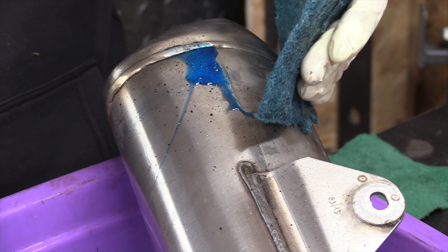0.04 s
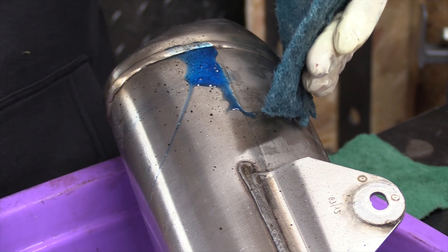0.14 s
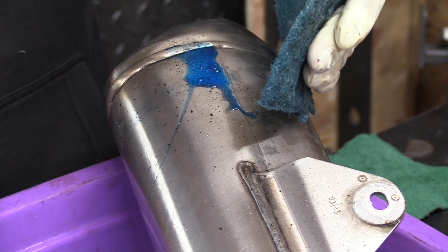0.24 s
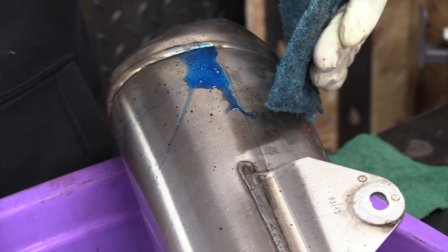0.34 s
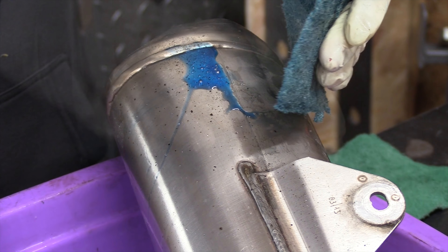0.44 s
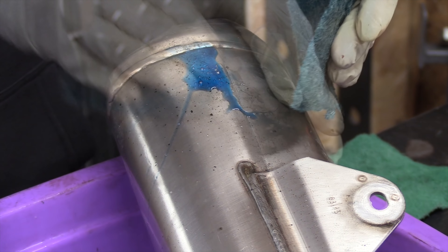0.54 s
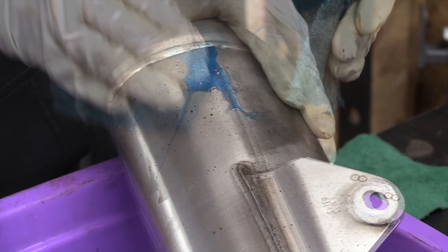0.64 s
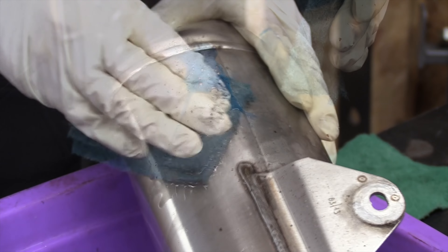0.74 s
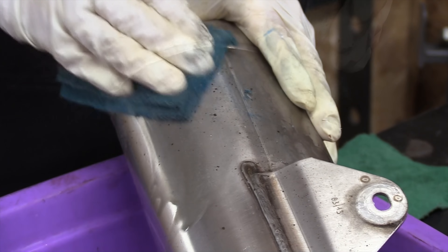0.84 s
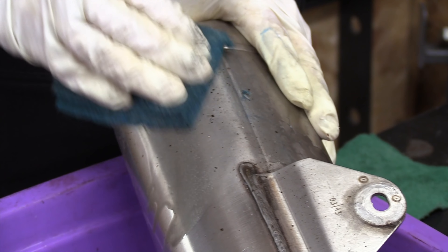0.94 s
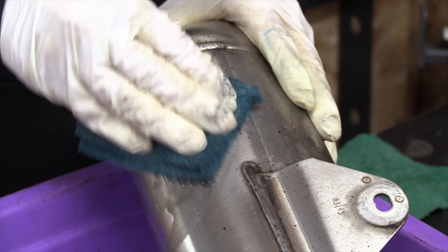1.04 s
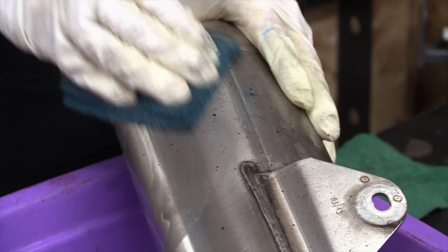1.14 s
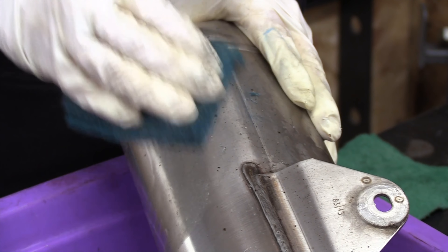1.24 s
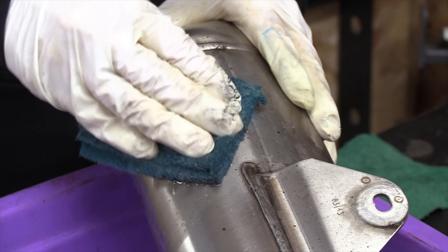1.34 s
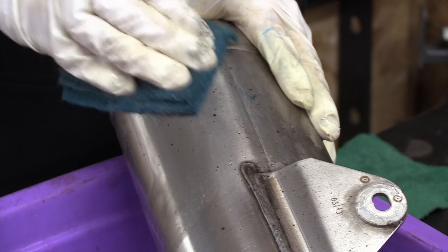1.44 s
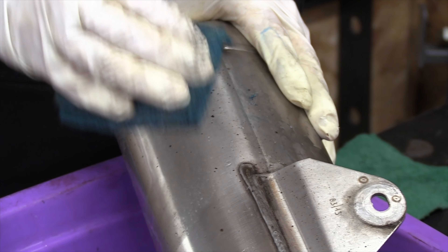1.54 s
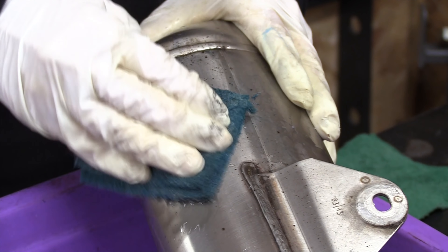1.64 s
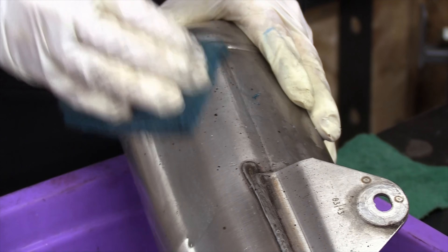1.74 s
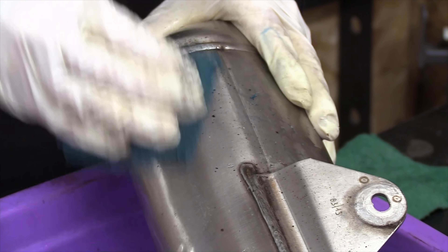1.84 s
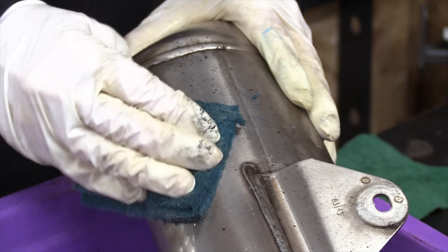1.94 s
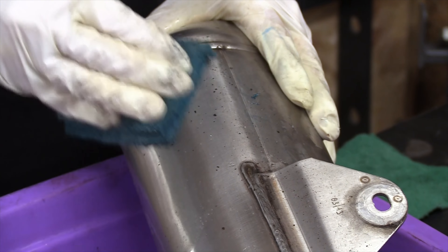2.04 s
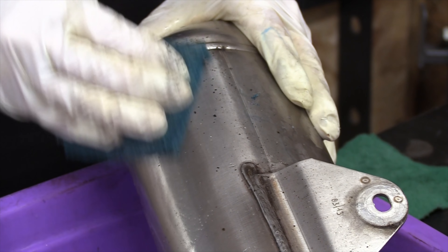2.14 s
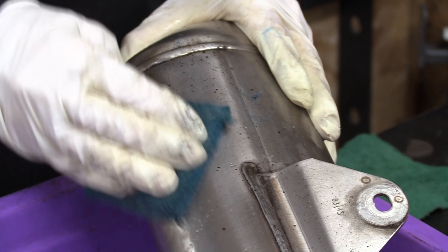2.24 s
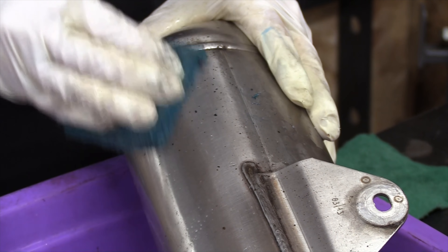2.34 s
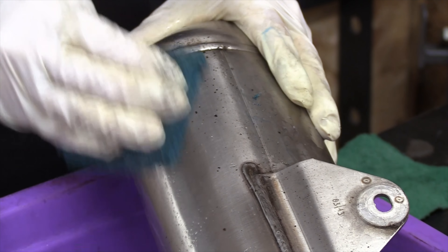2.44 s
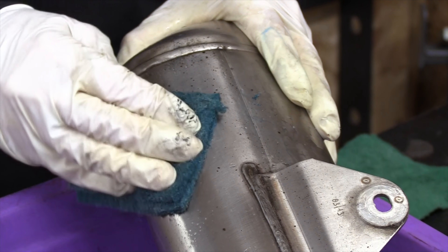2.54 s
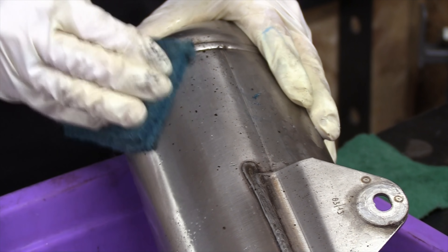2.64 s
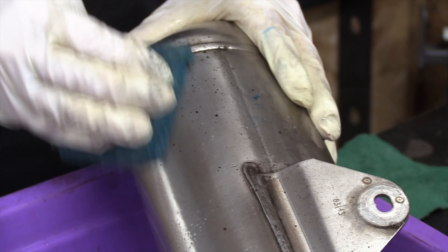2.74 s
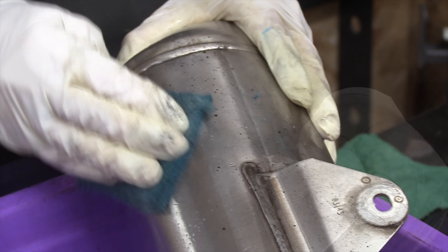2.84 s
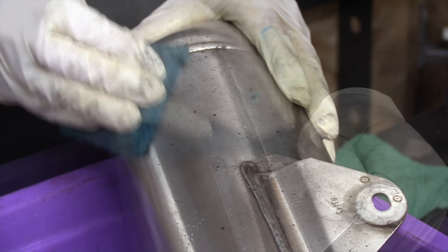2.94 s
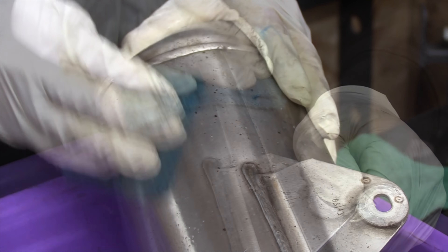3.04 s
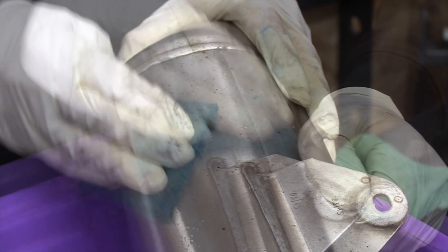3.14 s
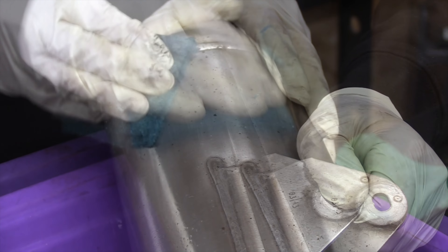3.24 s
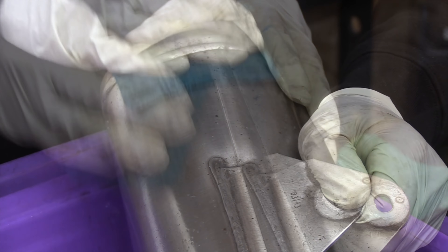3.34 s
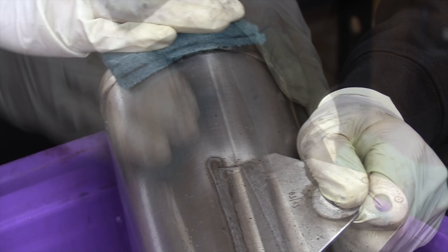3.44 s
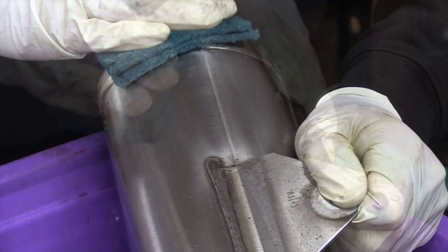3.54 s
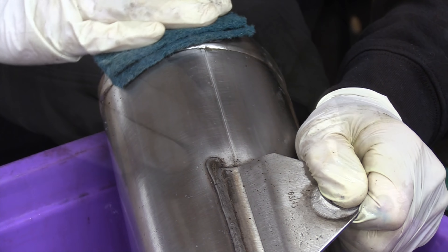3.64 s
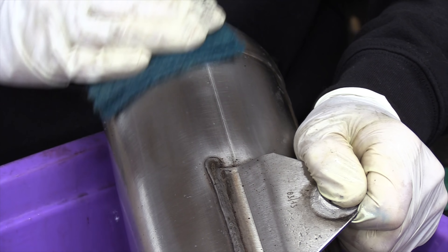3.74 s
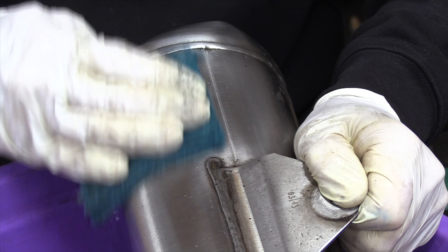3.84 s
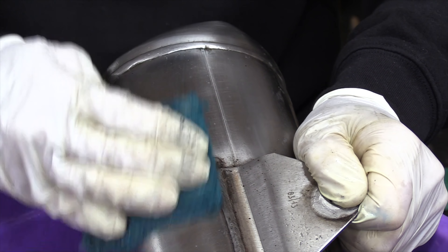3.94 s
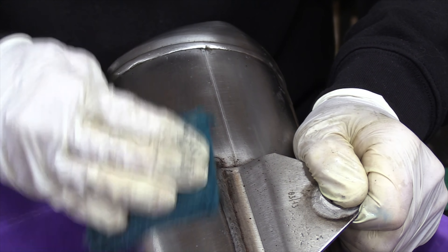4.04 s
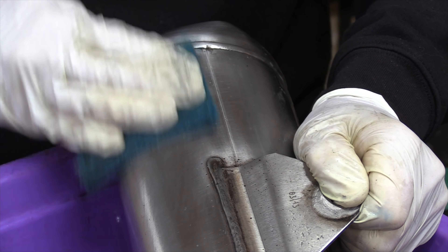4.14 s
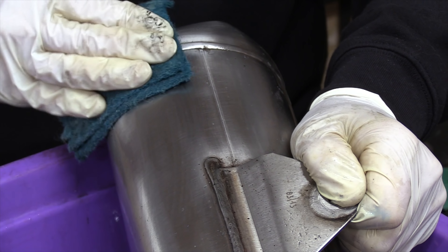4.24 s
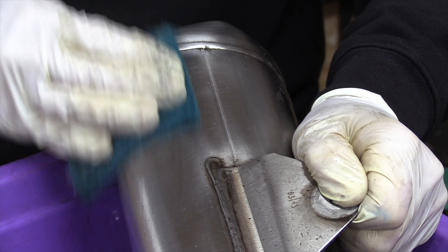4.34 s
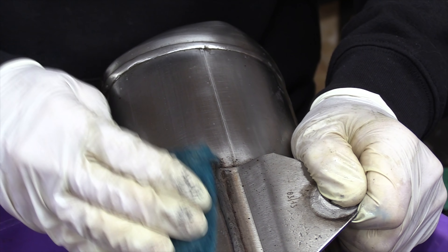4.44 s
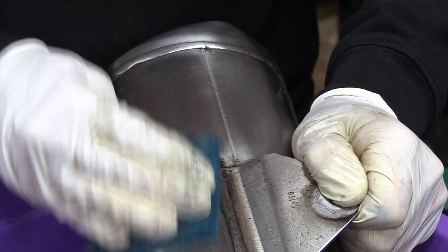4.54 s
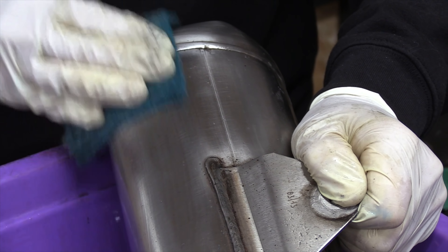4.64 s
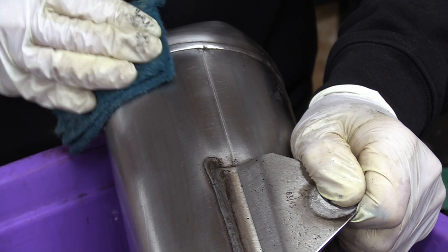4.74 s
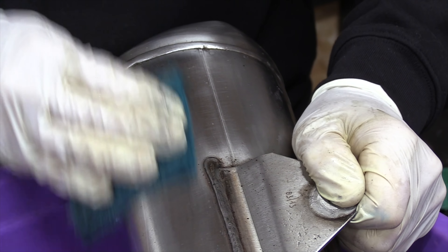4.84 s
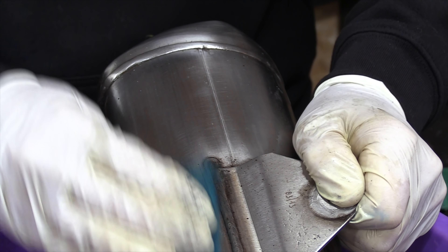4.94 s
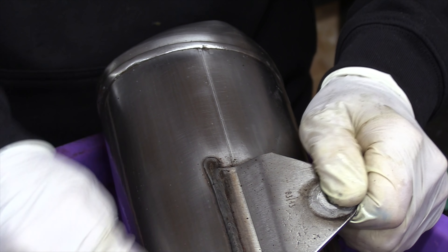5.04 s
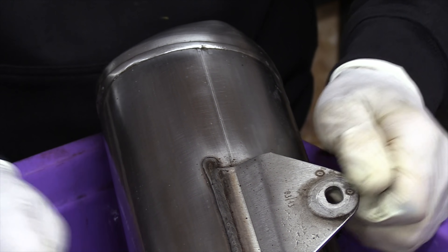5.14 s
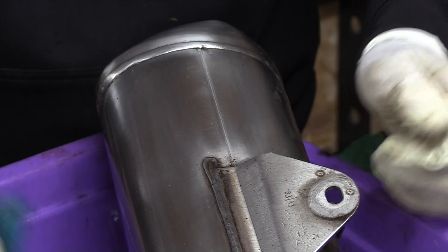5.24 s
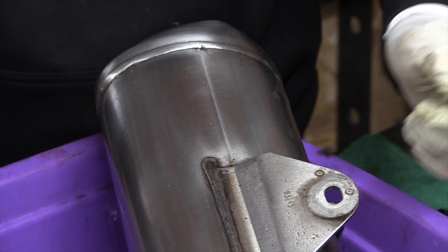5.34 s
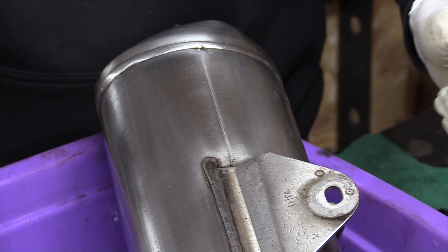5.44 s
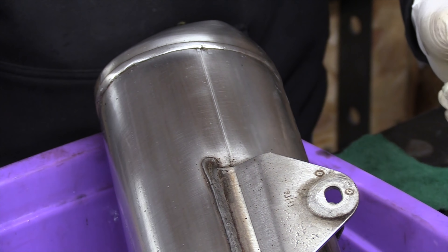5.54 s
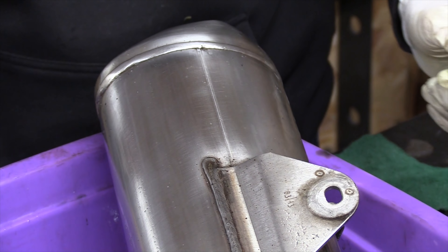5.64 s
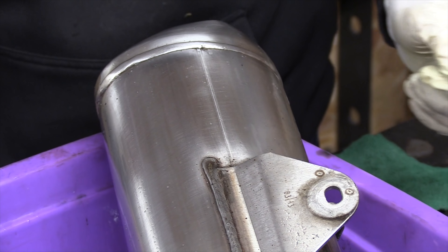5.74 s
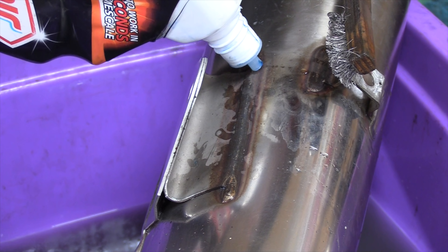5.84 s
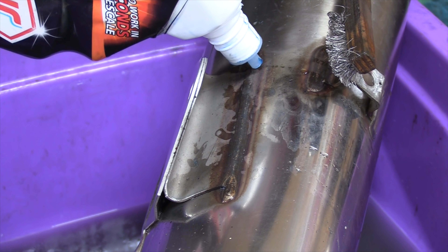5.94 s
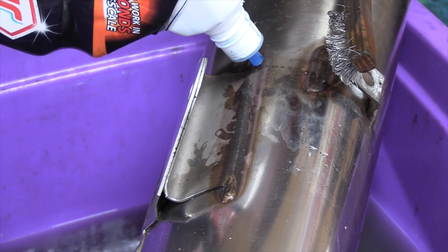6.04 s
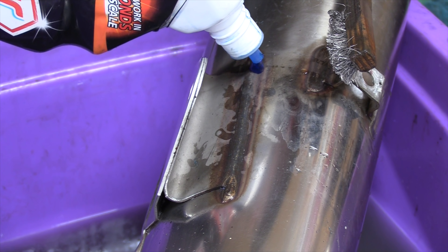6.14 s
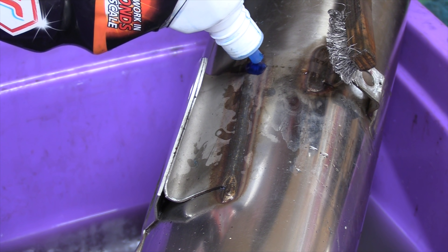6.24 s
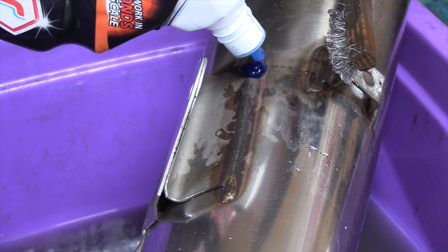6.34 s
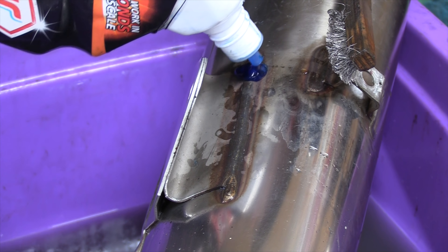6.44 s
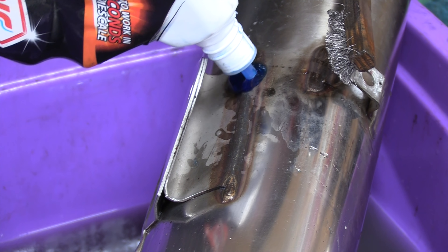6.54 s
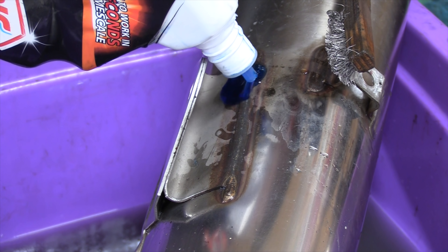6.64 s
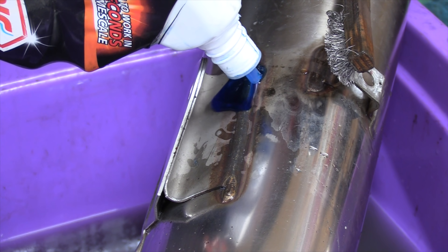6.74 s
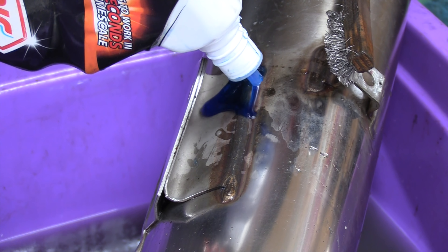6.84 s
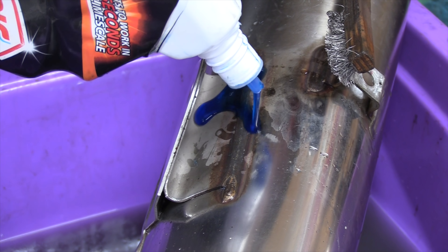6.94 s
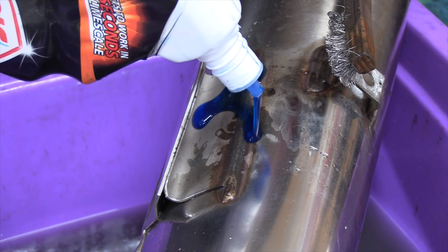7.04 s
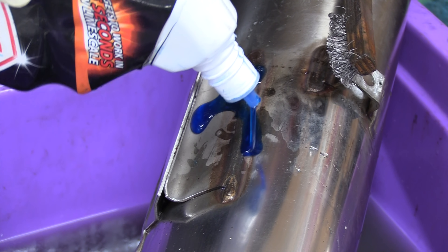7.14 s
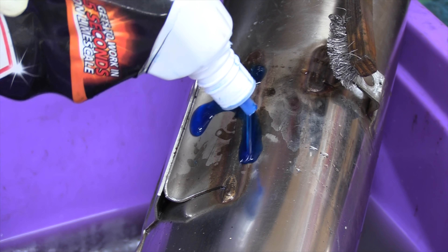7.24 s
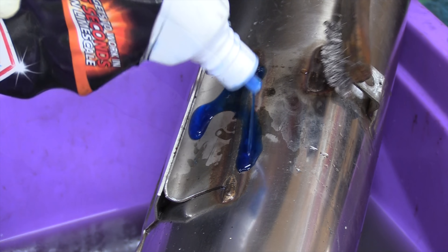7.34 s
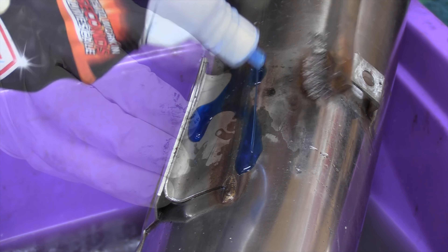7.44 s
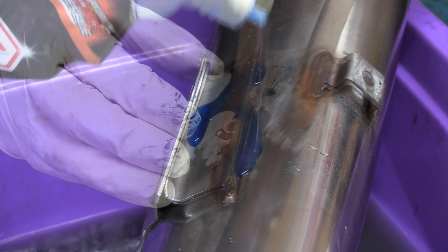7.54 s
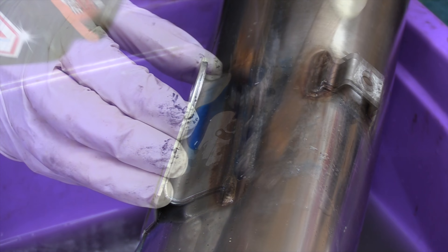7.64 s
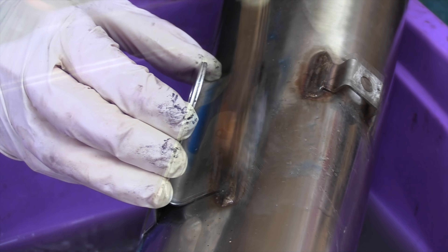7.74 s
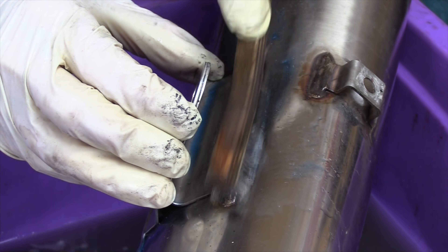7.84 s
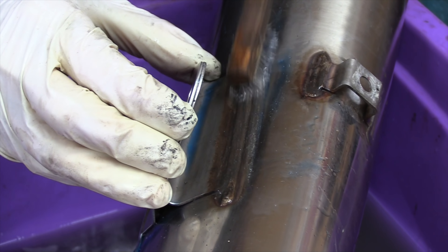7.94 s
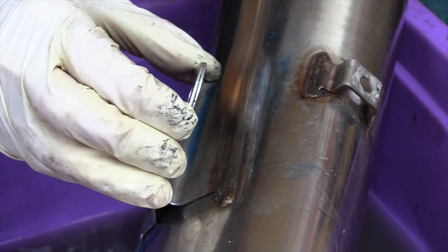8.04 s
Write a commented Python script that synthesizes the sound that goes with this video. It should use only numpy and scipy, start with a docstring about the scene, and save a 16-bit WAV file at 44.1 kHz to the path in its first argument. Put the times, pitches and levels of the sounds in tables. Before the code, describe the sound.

Close rasping of a scouring pad on hollow steel, knocking against a plastic tub, slowing to hissy wipes, then pausing before bright bracket scraping.

```python
"""A steel can's clang dies away over a fan's rush that swells and sinks: ringing modes and fading noise over coloured
noise. From half a second an abrasive pad scrubs the can, an exhaust part in a plastic tub: random grains drive its
rasp, ring and hiss, while knocks on the tub add clicks and ringing thuds. Longer wipes follow, with narrow rasps where
the pad drags, then a brief slide of tiny slips and a pause with one light tap on steel. At the end short strokes rub
a thin welded bracket and pluck bright pings from its modes. All but clang and fan echo in a small garage."""
import sys
import numpy as np
from scipy import signal
from scipy.fft import rfft, irfft
from scipy.io import wavfile
from scipy.ndimage import uniform_filter1d

SR = 44100
rng = np.random.default_rng(int(sys.argv[2]) if len(sys.argv) > 2 else 0)


def output_pcm(signal):
    """Save a mono or channel-first signal as 16-bit PCM at the path in sys.argv[1].

    Samples are clipped to [-1, 1] before scaling.
    """
    pcm = np.clip(np.atleast_2d(signal).T, -1, 1) * 32767
    wavfile.write(sys.argv[1], SR, np.round(pcm).astype(np.int16))


N = 357210
TIME = np.arange(N) / SR

# Colour of the opening clang's rattle. Each row: frequency in Hz, level in dB.
CLANG_COLOUR = [(60, -32), (140, -14), (300, 3.5), (600, 3.5), (1000, -5.5), (2000, -14), (4000, -28),
                (8000, -43), (15000, -54)]
# Modes of the steel can ringing free. Each row: frequency in Hz, level in dB, t60 in seconds.
CAN_MODES = [(137, -3, 0.25), (225, -15, 0.24), (364, 1, 0.57), (450, -4.5, 0.63), (513, -39, 0.27),
             (577, 2, 0.52), (780, -2.5, 0.56), (860, -16, 0.77), (1177, -5.5, 0.57), (1230, -14.5, 0.27),
             (1438, -29, 0.43), (1600, -21, .2), (1820, -7.5, 0.17), (2000, -24, 0.22), (2800, -11, 0.13),
             (3060, -15.5, 0.43)]
# Colour of the fan's rush in the room. Each row: frequency in Hz, level in dB.
ROOM_COLOUR = [(25, -48), (60, -27), (115, 0.5), (180, 5.5), (350, 5), (580, 3.5), (700, 1.5), (1100, -1.5),
               (2000, -5), (5700, -13), (9000, -19), (15500, -31.5)]
# Resonances of the fan. Each row: frequency in Hz, level in dB, t60 in seconds.
FAN_MODES = [(243.8, -6, 0.99), (571, -1, 0.076), (1234, -1, 0.16)]
# Room noise over time. Each row: time in seconds, level in dB.
ROOM_LEVEL = [(0, -54), (.52, -64.5), (.8, -45.5), (5.15, -48.5), (5.55, -51.5), (6.2, -57), (7.4, -57),
              (8.1, -49.5)]
# Colour of grains rasping on the can. Each row: frequency in Hz, level in dB.
RASP_COLOUR = [(60, -47), (120, -23), (200, -18), (350, 2), (900, 2), (2000, 3.5), (3000, 0.5), (5000, -8),
               (8000, -30), (15000, -30)]
# Colour of the hissing fibres. Each row: frequency in Hz, level in dB.
HISS_COLOUR = [(500, -42), (1800, -10.5), (3000, 3), (4200, 2), (6000, 2), (8500, -2), (10500, -4.5),
               (12500, -8.5), (15500, -23.5)]
# Pressure of the quick scrubbing. Each row: time in seconds, drive of the rasp in dB, drive of the hiss in dB.
CAN_PRESSURE = [(.54, -69, -59), (.6, -43.5, -56), (.68, -48, -54), (.75, -42, -44.5), (.89, -36.5, -40),
                (1.5, -36, -39), (2.3, -37.5, -38), (2.56, -38.5, -38.5), (2.7, -35.5, -37),
                (3.0, -41.5, -38)]
# Slow wipes along the can. Each row: start in seconds, end in seconds, drive of the rasp in dB,
# drive of the hiss in dB, change of pressure along the wipe in dB, easing in the middle in dB.
WIPES = [(3.068, 3.348, -42, -39, 0.5, 3.5), (3.349, 3.728, -44, -44, -11, 3.5),
         (3.746, 4.111, -48.5, -42.5, 0.5, 0.5), (4.119, 4.336, -43.5, -36, 0, 9),
         (4.341, 4.588, -52.5, -40.5, 2.5, 1.5), (4.593, 4.809, -47.5, -38, -1.5, 6),
         (4.813, 5.136, -51.5, -42, -3.5, 1.5), (5.128, 5.358, -51.5, -56.5, -4, 2.5)]
# Pressure on the bracket. Each row: time in seconds, drive of the rasp in dB, drive of the hiss in dB.
BRACKET_PRESSURE = [(7.46, -91, -67.5), (7.56, -54.5, -51), (7.635, -44.5, -37.5), (7.72, -48.5, -45),
                    (7.79, -42.5, -37.5), (7.855, -41, -32.5), (7.93, -38, -34), (8.05, -40.5, -40.5),
                    (8.1, -31.5, -30.5)]
# Colour of grains rasping on the bracket. Each row: frequency in Hz, level in dB.
BRACKET_RASP_COLOUR = [(110, -26), (200, -8), (330, -6), (600, -5), (1300, 10.5), (2200, -2.5),
                       (3500, -2.5), (6000, -11), (10500, -3), (15000, -42)]
# Modes of the bracket, before scaling of their times. Each row: frequency in Hz, level in dB, t60 in seconds.
BRACKET_MODES = [(221.7, -6.5, 0.54), (445, -3.5, 0.14), (691, 6, 0.14), (745, 8, 0.16), (875, 6.5, 0.092),
                 (1140, 1, 0.069), (1246, -17, .1), (1418, 1.5, 0.15), (1480, -4, 0.082), (1873, 10, 0.062),
                 (2047, 3.5, 0.11), (2650, -1, 0.13), (3820, -1, 0.16)]
# Knocks of the can on the tub, mostly as a push begins.
# Each row: start in seconds, level in dB, pitch of the thud in Hz, pitch of the click in Hz.
KNOCKS = [(.583, -10.5, 263, 940), (.832, -23, 490, 624), (0.983, -23.5, 440, 754),
          (1.301, -13.5, 374, 630), (1.575, -23, 472, 700), (1.612, -23, 310, 740), (1.907, -25, 336, 780),
          (2.203, -15, 376, 710), (2.497, -13.5, 407, 950), (2.797, -15, 407, 890),
          (3.091, -19.5, 345, 920), (3.369, -22, 429, 860), (4.364, -35, 425, 704),
          (5.319, -35.5, 428, 750)]
# Modes of can and tub together, ringing free. Each row: frequency in Hz, level in dB, t60 in seconds.
TUB_MODES = [(151, -3, 0.29), (240, 6, 0.033), (309.4, 8, 0.18), (382.2, 5, 0.31), (430, 4.5, 0.18),
             (490, -7, 0.45), (584, -1.5, 0.21), (706, -9, 0.46), (820, -38, 0.45), (810, 5, 0.04),
             (1030, -32, 0.21)]
# Colour of a click of steel on plastic. Each row: multiple of its pitch, level in dB.
CLICK_COLOUR = [(.06, -73), (.17, -16), (.4, -1.5), (.72, 0.5), (1, 2), (1.25, -3), (1.6, -5.5),
                (2.7, -16.5), (3.8, -25), (7, -63), (16, -59)]
# Rasps of the pad dragging over a tacky patch.
# Each row: start in seconds, length in seconds, level in dB, pitch in Hz.
DRAGS = [(3.883, 0.042, -45, 3000), (4.37, 0.12, -44.5, 3560), (4.637, .045, -44.5, 2400),
         (4.716, 0.088, -41, 3070)]
# Narrow colour of a drag. Each row: multiple of its pitch, level in dB.
DRAG_COLOUR = [(.3, -37), (.6, -10.5), (.88, -4.5), (1, -3), (1.14, -7), (1.5, -10), (3, -40)]
# Modes of the light tap. Each row: frequency in Hz, level in dB, t60 in seconds.
TAP_MODES = [(420, -5, .05), (640, -7, .04), (800, -1, .06), (915, 0, .07), (1070, -2, .06),
             (1550, -17, .03), (2200, -16, .03), (2550, -19, .025)]
# Snags of the pad on the bracket's edge. Each row: start in seconds, level in dB, pitch in Hz.
SNAGS = [(7.568, -40, 726), (7.615, -36.5, 1400), (7.768, -31, 1310), (7.832, -30.5, 750),
         (7.886, -34, 735), (7.938, -23, 1320), (7.963, -30, 750), (7.999, -40.5, 230)]

# the room noise dips briefly
DIP_S, DIP_DB, DIP_RECOVERY_S = 5.893, -30, 0.019
# quick scrubbing keeps an even beat; swell 0 is an even stroke, 1 a rounded one
CAN_START_S, CAN_STROKES_PER_S = .541, 6.725
CAN_SWELL_FIRST, CAN_SWELL_LAST = 0.79, 0.64
# the hand bears down harder at the near end of its travel: change along a stroke
CAN_LEAN_DB = 3
WIPE_SWELL = 0.14
# from here on the pad rubs the bracket, in short strokes on an even beat
BRACKET_FROM_S = 7.0
BRACKET_START_S, BRACKET_STROKES_PER_S = 7.446, 6.42
BRACKET_SWELL, BRACKET_LEAN_DB = 0.4, -5
# a typical knock: pitch, click against thud, lag of the thud, ring time as a share of the free ring
KNOCK_HZ, CLICK_DB, THUD_LAG_S, KNOCK_SHARE = 403.4, -6.5, 0.002884, 0.36
# a lower knock lands flatter: its click is weaker and it rings longer (power of the pitch)
CLICK_DB_PER_OCTAVE, RING_POWER = 8, 1.3
# the chatter sounds above the thud (multiple of its pitch)
CHATTER_RATIO = 1.4
# the can slides as the hand lets go: time and level of the peak, growth and fall
SLIDE_S, SLIDE_DB, SLIDE_RISE_DB_PER_S, SLIDE_FALL_DB_PER_S = 5.305, -39, 112, 400
TAP_S, TAP_DB = 6.676, -36
TOP_HZ = 15550


def undb(db):
    """Decibels to gain."""
    return 10 ** (np.asarray(db) / 20)


def unit(x):
    """Scale to rms 1."""
    return x / np.sqrt(np.mean(x ** 2))


def add(out, s, x):
    """Mix x into out from time s."""
    i = max(int(s * SR), 0)
    out[i:i + len(x)] += x[:max(N - i, 0)]


def through(x, response):
    """Pass x through a response scaled to unit energy."""
    return signal.fftconvolve(x, response / np.linalg.norm(response))[:len(x)]


def colour(points, size=4096):
    """Causal, minimum-phase response with the given (Hz, dB) spectrum."""
    hz, db = np.transpose(points)
    f = np.maximum(np.arange(size // 2 + 1) * SR / size, 1)
    log_gain = np.log(undb(np.interp(np.log(f), np.log(hz), db)))
    cepstrum = irfft(log_gain)
    # fold the cepstrum forward so that the response starts at once
    cepstrum[1:size // 2] *= 2
    cepstrum[size // 2 + 1:] = 0
    return irfft(np.exp(rfft(cepstrum)))


def fade(t60):
    """One second of exponential decay, 60 dB down after t60 seconds."""
    return np.exp(-np.log(1000) * TIME[:SR] / t60)


def ring(modes, share=1):
    """Sum of decaying modes, neighbours in opposite phase; share scales their decay times."""
    out = np.zeros(SR)
    for k, (hz, db, t60) in enumerate(modes):
        tone = np.sin(2 * np.pi * hz * TIME[:SR])
        out += (-1) ** k * undb(db) * fade(t60 * share) * tone
    return out


def struck(modes, pitch_hz, share=1, narrow_db=9):
    """A blow favours modes near its pitch, losing narrow_db per octave away from it; peak 1."""
    favoured = [(hz, db - narrow_db * abs(np.log2(hz / pitch_hz)), t60) for hz, db, t60 in modes]
    x = ring(favoured, share)
    x = x * (1 - np.exp(-TIME[:SR] / 0.0018))  # the contact builds up softly
    return x / np.abs(x).max()


def grit(per_s, spread_db):
    """Random tiny catches of abrasive grains at unit rms; a wider spread makes a few much stronger."""
    hit = rng.random(N) < per_s / SR
    strength = undb(spread_db * np.minimum(rng.exponential(size=N), 5))
    return unit(hit * rng.standard_normal(N) * strength)


def walk(rate):
    """Random wander: straight lines between normal draws, rate of them per second."""
    knots = rng.standard_normal(N)
    return np.interp(TIME * rate, np.arange(N), knots)


def clang():
    """The freely ringing can and its rattle on the tub die away at the start."""
    out = np.zeros(N)
    rattle = through(rng.standard_normal(SR) * fade(0.54), colour(CLANG_COLOUR))
    add(out, 0, undb(-20.5) * rattle)
    add(out, 0, undb(-28.5) * ring(CAN_MODES))
    return out


def room_noise():
    """Rush of a fan with a few narrow resonances; its level swells and sinks, and dips once, briefly."""
    rush = through(rng.standard_normal(N), colour(ROOM_COLOUR))
    whirr = through(rng.standard_normal(N), ring(FAN_MODES))
    level_db = np.interp(TIME, *np.transpose(ROOM_LEVEL))
    dip_db = DIP_DB * (TIME > DIP_S) * np.exp(-np.abs(TIME - DIP_S) / DIP_RECOVERY_S)
    return (rush + undb(-8.0) * whirr) * undb(level_db + dip_db + 0.34 * walk(2.02))


def stroke(start, end, swell, lean_db, ease_db=0):
    """Speed and drive of one push: the pad speeds up and slows down while the pressure shifts along it."""
    along = np.linspace(0, 1, max(int((end - start) * SR), 2))
    swing = np.abs(np.sin(np.pi * along))
    pressure_db = lean_db * (along - .5) - ease_db * swing
    return swing, swing ** max(swell, 0) * undb(pressure_db)


def back_and_forth(start, per_s, swells, lean_db, pressure):
    """Pulls and pushes on an even beat; yields start, speed, drive, rasp dB, hiss dB for each."""
    s, rasp_db, hiss_db = np.transpose(pressure)
    for k, swell in enumerate(swells):
        turn = start + k / per_s
        swing, drive = stroke(turn, turn + 1 / per_s, swell, (-1) ** k * lean_db)
        t = turn + TIME[:len(swing)]
        yield turn, swing, drive, np.interp(t, s, rasp_db), np.interp(t, s, hiss_db)


def hand(rasp_floor=0.11, hiss_floor=0.1):
    """Speed of the pad and drive of rasp and hiss: quick scrubs, slow wipes, then the bracket."""
    can_swells = np.linspace(CAN_SWELL_FIRST, CAN_SWELL_LAST, 17)  # strokes get flatter
    quick = back_and_forth(CAN_START_S, CAN_STROKES_PER_S, can_swells, CAN_LEAN_DB, CAN_PRESSURE)
    slow = []
    for start, end, rasp_db, hiss_db, lean_db, ease_db in WIPES:
        swing, drive = stroke(start, end, WIPE_SWELL, lean_db, ease_db)
        slow.append((start, swing, drive, rasp_db, hiss_db))
    short = back_and_forth(BRACKET_START_S, BRACKET_STROKES_PER_S, [BRACKET_SWELL] * 5,
                           BRACKET_LEAN_DB, BRACKET_PRESSURE)
    speed, rasp, hiss = np.zeros((3, N))
    for start, swing, drive, rasp_db, hiss_db in [*quick, *slow, *short]:
        add(speed, start, swing)
        # some fibres slide on while the hand turns
        add(rasp, start, undb(rasp_db) * (rasp_floor + (1 - rasp_floor) * drive))
        add(hiss, start, undb(hiss_db) * (hiss_floor + (1 - hiss_floor) * drive))
    rasp, hiss = uniform_filter1d([rasp, hiss], size=500)  # the soft pad takes up each change gradually
    # the pressure trembles
    return speed, rasp * undb(2.34 * walk(45)), hiss * undb(.5 * walk(56))


def scrubbing():
    """Grains catch on the steel and ring the can or the bracket; the fibres hiss on their own."""
    speed, rasp, hiss = hand()
    catches = rasp * grit(per_s=7000, spread_db=2.5)
    on_can = catches * (TIME < BRACKET_FROM_S)
    on_bracket = catches * (TIME >= BRACKET_FROM_S)

    can = undb(1.5) * through(on_can, colour(RASP_COLOUR))
    can += undb(-14) * through(on_can, ring(CAN_MODES, share=.3))  # damped ring

    bracket = undb(1) * through(on_bracket, colour(BRACKET_RASP_COLOUR))
    bracket += undb(-1) * through(on_bracket, ring(BRACKET_MODES, share=1.4))
    # a small plate radiates little bass
    bracket = signal.sosfilt(signal.butter(3, 170, "high", fs=SR, output="sos"), bracket)

    # sparse coarse grains snap free, on can and bracket alike
    coarse = undb(-17) * through(rasp * grit(per_s=110, spread_db=1), colour(RASP_COLOUR))

    fibres = undb(1.5) * through(hiss * grit(per_s=24000, spread_db=0.2), colour(HISS_COLOUR))
    dull = signal.sosfilt(signal.butter(1, 4500, fs=SR, output="sos"), fibres)
    bright = np.clip(0.26 + speed / 0.51, 0, 1)  # a slow pad loses its top
    return can + bracket + coarse + dull + bright * (fibres - dull)


def click_colour(pitch_hz):
    """Response of steel tapping plastic, its spectrum scaled to a pitch."""
    return colour([(multiple * pitch_hz, db) for multiple, db in CLICK_COLOUR])


def knocks(click_t60=0.073, rebound_s=.0105, rebound_db=-9, chatter_db=-17, chatter_t60=0.4):
    """The can's edge clicks on the tub, its weight lands a moment later and chatters to rest; the click
    rebounds once."""
    out = np.zeros(N)
    for s, db, thud_hz, click_hz in KNOCKS:
        click_db = db + CLICK_DB + CLICK_DB_PER_OCTAVE * np.log2(thud_hz / KNOCK_HZ)
        click = through(rng.standard_normal(SR) * fade(click_t60), click_colour(click_hz))
        thud = struck(TUB_MODES, thud_hz, KNOCK_SHARE * (KNOCK_HZ / thud_hz) ** RING_POWER)
        chatter_ring = struck(TUB_MODES, CHATTER_RATIO * thud_hz, share=0.13, narrow_db=15.0)
        chatter = through(rng.standard_normal(SR) * fade(chatter_t60), chatter_ring)
        add(out, s, undb(click_db) * click)
        lands = s + THUD_LAG_S * (thud_hz / KNOCK_HZ) ** 2  # a flatter, lower knock lands sooner
        add(out, lands, undb(db) * (thud + undb(chatter_db) * chatter))
        add(out, lands + rebound_s, undb(click_db + rebound_db) * click)
    return out


def drags():
    """Fibres stick and slip in a brief swell around one pitch."""
    out = np.zeros(N)
    slips = grit(per_s=2100, spread_db=2.5)
    for s, length, db, pitch_hz in DRAGS:
        _, drive = stroke(s, s + length, .5, 0)
        narrow = colour([(multiple * pitch_hz, level_db) for multiple, level_db in DRAG_COLOUR])
        band = through(slips, narrow)
        add(out, s, undb(db) * drive * band[int(s * SR):][:len(drive)])
    return out


def slide():
    """The can shifts on the tub in a run of tiny slips that grows and stops short."""
    slips = grit(per_s=1500, spread_db=1)
    before_db = SLIDE_RISE_DB_PER_S * (SLIDE_S - TIME)
    after_db = SLIDE_FALL_DB_PER_S * (TIME - SLIDE_S)
    below_db = np.maximum(before_db, after_db)
    return through(slips * undb(SLIDE_DB - below_db), click_colour(pitch_hz=796))


def tap():
    """A bottle's plastic nozzle touches the steel: a dry tick of noise and a short modal ring."""
    out = np.zeros(N)
    tick = through(rng.standard_normal(SR) * fade(0.04), click_colour(pitch_hz=940))
    add(out, TAP_S, undb(-34.0) * tick + undb(TAP_DB) * ring(TAP_MODES))
    return out


def snags():
    """The pad plucks the bracket's edge: short pings of the modes closest to each pitch."""
    out = np.zeros(N)
    for s, db, pitch_hz in SNAGS:
        add(out, s, undb(db) * struck(BRACKET_MODES, pitch_hz, share=0.85, narrow_db=26))
    return out


def garage(x, t60=0.68):
    """Short, dull reverberation of a small room: a decaying noise tail under the direct sound."""
    tail = rng.standard_normal(SR) * fade(t60) * (TIME[:SR] > .008)
    tail = signal.sosfilt(signal.butter(1, 7000, fs=SR, output="sos"), tail)
    return x + undb(-15.0) * through(x, tail)


def scene():
    """One close microphone feeds both channels; clang and room noise stay out of the reverberation."""
    handled = scrubbing() + knocks() + drags() + slide() + tap() + snags()
    mono = clang() + room_noise() + garage(handled)
    return np.array([mono, mono])


def record(dry):
    """The microphone sheds the deep bass and the recorder cuts the top."""
    lean = signal.sosfilt(signal.butter(4, 88, "high", fs=SR, output="sos"), dry)
    return signal.sosfilt(signal.ellip(10, .2, 80, TOP_HZ, fs=SR, output="sos"), lean)


dry = scene()
out = record(dry)
output_pcm(out)
```